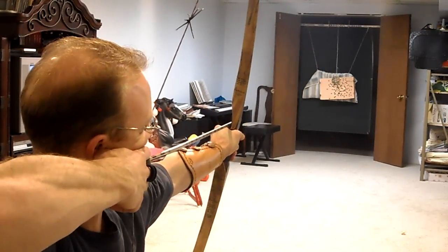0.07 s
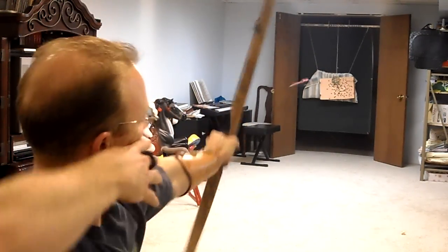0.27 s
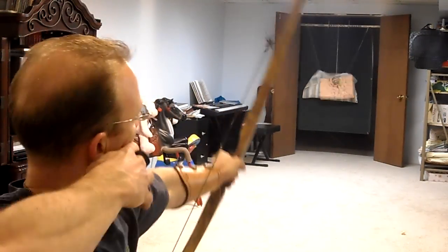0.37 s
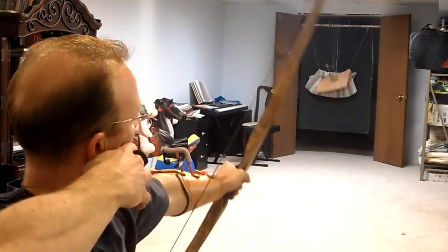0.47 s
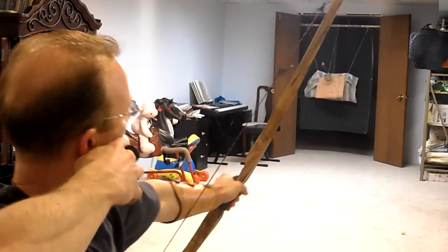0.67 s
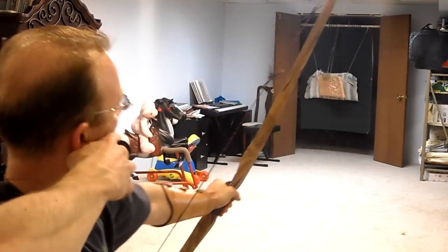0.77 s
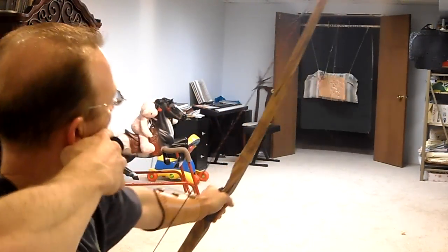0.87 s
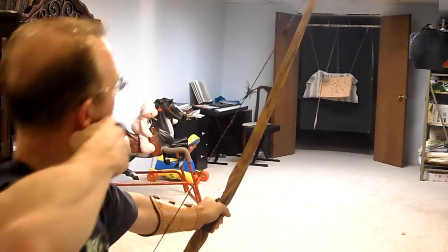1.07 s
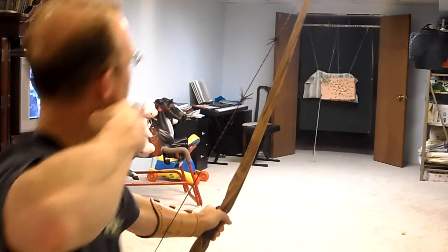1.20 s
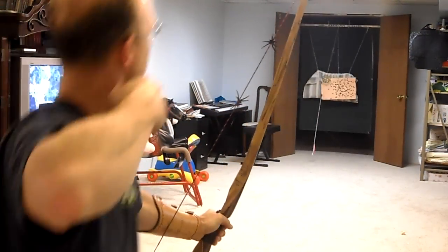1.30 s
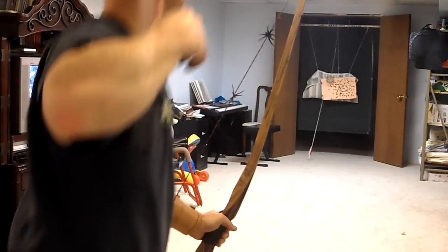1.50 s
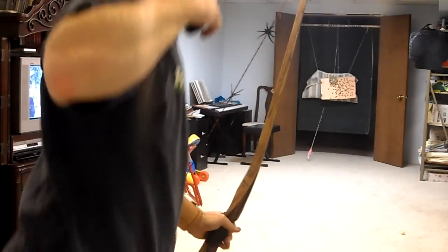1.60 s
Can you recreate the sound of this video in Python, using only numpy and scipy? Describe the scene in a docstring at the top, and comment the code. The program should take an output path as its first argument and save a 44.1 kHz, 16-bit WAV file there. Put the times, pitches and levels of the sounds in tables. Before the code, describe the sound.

Bow twang and sharp slam, a split second later a hard thudding arrow hit across the room

```python
"""Carpeted room: a longbow is loosed close by; the arrow smacks a mat hung some metres off.
Bow: the string creeps on the fingers, the arrow scrapes by (clicks); the slam (clicks) leaves modes humming.
Mat: cracks, tearing clicks, thud of mat and room modes, then slaps and rustle; soft knocks (noise, modes).
Camera: coloured-noise hiss, tick pairs each frame, faint sine whines, a high whistle of two beating sines.
The slam, the smack and a share of the small sounds fill the room (early echo, decaying noise bands)."""
import sys
import numpy as np
from scipy import signal
from scipy.fft import rfft, irfft
from scipy.io import wavfile

SR = 44100
rng = np.random.default_rng(int(sys.argv[2]) if len(sys.argv) > 2 else 0)


def waveform_to_disk(signal):
    """Save audio, clipped to [-1, 1], as 16-bit WAV at the path in sys.argv[1]."""
    frames = np.transpose(np.atleast_2d(signal))
    scaled = np.clip(frames, -1, 1) * 32767
    samples = np.round(scaled).astype(np.int16)
    wavfile.write(sys.argv[1], SR, samples)


def linear_from_db(decibels):
    """Turn decibels (scalar or array-like) into linear amplitude factors; 0 gives 1."""
    return 10 ** (np.asarray(decibels, float) / 20)


N = 72765
T = np.arange(N) / SR

# Spectra give relative density only: colour() sets unit energy.
# camera hiss spectrum: (frequency [Hz], density [dB/Hz])
HISS_SPECTRUM = [(20, -4.5), (200, -10), (700, -3.5), (1400, -13.5), (3000, -15.5), (4600, -20.5),
                 (4900, -14.5), (5200, -21), (10000, -23.5), (15500, -25), (16200, -39.5)]
# hiss and ticks, louder after the shot: (time [s], gain [dB])
HISS_RISE = [(0, -3.5), (.6, 1), (1.66, -0.5)]
# camera whines: (start [s], length [s], frequency [Hz], rms level before waver [dB])
WHINES = [(.0, 0.29, 802, -74), (0.638, 0.16, 811, -66.5), (0.87, 0.086, 802, -63.5),
          (1.039, 0.06, 687, -71), (1.095, 0.028, 694, -68)]
# lower whistle tone: (time [s], peak level [dB])
WHISTLE_LEVEL = [(0, -72), (.2, -71), (.75, -63), (1.0, -61.5), (1.1, -68.5), (1.65, -66)]
HISS_BASE_DB = -67  # before HISS_RISE
FRAMES_PER_S = 29.97
# tick level is before HISS_RISE; gap and lag are medians
TICK_START_S, TICK_BASE_DB, TICK_TOP_HZ, TICK_GAP_S, TICK_JITTER_S = .0148, -52.5, 1500, .0025, .0008
EXTRA_TICK_RE_DB, EXTRA_TICK_LAG_S = -4, 0.037  # looser second pair in each frame
WHINE_EDGE_S, WHINE_WAVER_DB = 0.012, 1.5
WHISTLE_HZ, WHISTLE_BEAT_HZ, WHISTLE_DIP_S = 15734, 10.1, .041
WHISTLE_UPPER_SHARE = .6

# room decay: (frequency [Hz], T60 [s])
ROOM_T60 = [(60, 0.81), (250, 0.4), (1000, 0.34), (3000, 0.39), (7000, 0.39), (14000, 0.24)]
# room tone: (frequency [Hz], relative level [dB])
ROOM_TONE = [(60, -2.5), (250, 1.5), (1000, 5), (3000, -0.5), (7000, -1), (14000, 0.5)]
ROOM_PATCHY_DB, ROOM_CLUMP_SAMPLES, ROOM_BUILD_S = 2.5, 600, 0.0053
BOW_ROOM_DB, MAT_ROOM_DB, SMALL_ROOM_DB = -2, 8, -11  # sends

# mat and arrow rustle: (time [s], level [dB])
RUSTLE_LEVEL = [(.6, -84), (.67, -67), (.68, -58.5), (.69, -62), (.728, -55.5), (.76, -67), (.79, -71),
                (.802, -58.5), (.828, -69.5), (.845, -62.5), (.93, -72.5), (.958, -64), (.985, -75),
                (1.05, -78.5)]
# rustle spectrum: (frequency [Hz], density [dB/Hz])
RUSTLE_SPECTRUM = [(300, -8.5), (700, 3), (2000, -6.5), (3200, -4.5), (4300, 0), (5300, -5.5), (6500, -3),
                   (8000, -9), (14000, -25)]
# soft knocks: (time [s], level [dB], lowest [Hz], highest [Hz], T60 [s])
KNOCKS = [(1.139, -61.5, 3400, 6000, 0.1), (1.244, -58.5, 287, 1290, 0.38), (1.409, -55, 199, 8800, 0.081),
          (1.568, -55.5, 327, 516, 0.15), (1.623, -61, 500, 1298, 0.16)]
# tap on the shaft: (time [s], level re modes [dB])
SHAFT_TAP = [(1.1412, 0)]
# shaft modes: (frequency [Hz], level [dB], T60 [s])
SHAFT_MODES = [(380, -55, .05), (900, -49, .05), (1800, -54, .035)]
# something hollow is bumped: (time [s], level re modes [dB])
THUMPS = [(1.2455, -6), (1.259, 2), (1.299, -7)]
# modes of the hollow thing: (frequency [Hz], level [dB], T60 [s])
THUMP_MODES = [(437.8, -58, 0.09), (684, -57.5, 0.13), (1310, -67.5, 0.093)]
RUSTLE_CLICKS_PER_S = 5000
KNOCK_POLE = 0.7  # tilts knocks to the bass
MODE_RISE_MAX_S = 0.0072

# smack spectrum: (frequency [Hz], density [dB/Hz])
SMACK_SPECTRUM = [(100, -22.5), (300, -7.5), (600, 0), (1200, -8.5), (2500, -7), (4000, -7), (7000, -9.5),
                  (12000, -13.5), (16000, -13)]
# mat modes, with room resonances at 330 and 3150 Hz: (frequency [Hz], level [dB], T60 [s])
MAT_AND_ROOM_MODES = [(38, -54, .45), (245, -25, .12), (330, -37, .35), (368, -28, .12), (520, -26, .18),
                      (612, -21, .11), (668, -26, .13), (780, -22, .11), (930, -23, .09), (1380, -32, .1),
                      (3150, -42, .4)]
# mat slaps back: (time [s], thud level re smack [dB], crackle level [dB])
SLAPS = [(0.4169, -11, -32), (0.435, -15.5, -39), (.47, -15, -33), (.49, -24, -63), (0.554, -31.5, -73)]
# tip tears through: (time [s], click level before band-pass and doubling [dB])
CRACKS = [(.3888, -3), (.3894, -8), (.3912, -11), (.3925, -11), (.3946, -9)]
SMACK_S, SMACK_DB, SMACK_HOLD_S, SMACK_T60_S, SMACK_CLICKS_PER_S = .3886, -16, .006, .03, 12000
CRACK_LOW_HZ, CRACK_HIGH_HZ = 700, 12000

# string creeps on the fingers: (time [s], level [dB])
CREEP_LEVEL = [(.1625, -85.5), (.164, -66), (.171, -62), (.175, -71.5), (.198, -68)]
# arrow scrapes along the bow: (time [s], level [dB])
SCRAPE_LEVEL = [(.1995, -70.5), (.2005, -44), (.2065, -45), (.208, -41), (.214, -48.5), (.219, -36.5),
                (.221, -61.5)]
# creep and scrape spectrum: (frequency [Hz], density [dB/Hz])
SCRAPE_SPECTRUM = [(100, -23.5), (500, -2), (1100, 2), (2500, -6), (5600, -7.5), (9000, -16), (16000, -30)]
# slam spectrum: (frequency [Hz], density [dB/Hz])
SLAM_SPECTRUM = [(60, -16), (460, -7.5), (850, -8.5), (1740, -9), (3500, -1.5), (6000, -4), (9000, -11.5),
                 (16000, -20)]
# string and limb modes: (frequency [Hz], level [dB], T60 [s])
BOW_MODES = [(51.9, -44, 0.12), (187.7, -46, 0.79), (444, -48, 0.34), (463, -44, 0.45), (501, -36, 0.062),
             (732, -45, 0.28), (875, -31, 0.053)]
# arrow knocks the bow in passing: (time [s], level re slam [dB])
NOCK_TAP = (.2075, -16.5)
# early room echo of the slam: (time [s], level [dB])
SLAM_ECHO = [(0.2295, -39)]
SLAM_S, SLAM_DB, SLAM_T60_S, SLAM_CLICKS_PER_S = .2198, -30, 0.028, 6500  # string stops


def rms_one(x):
    """Scale to rms 1."""
    return x / np.sqrt(np.mean(x ** 2) + 1e-20)


def curve(rows):
    """Gain along a (time [s], level [dB]) table, -200 dB outside."""
    s, db = np.transpose(rows)
    return linear_from_db(np.interp(T, s, db, left=-200, right=-200))


def at_hz(points, hz):
    """Read a table on a log-frequency axis."""
    table_hz, value = np.transpose(points)
    return np.interp(np.log(hz + 1), np.log(table_hz), value)


def colour(x, spectrum):
    """Causal minimum-phase filter of unit energy, by folding the cepstrum."""
    log_gain = at_hz(spectrum, np.linspace(0, SR / 2, 4097)) * np.log(10) / 20
    cepstrum = irfft(log_gain)
    cepstrum[1:4096] *= 2
    cepstrum[4097:] = 0
    h = irfft(np.exp(rfft(cepstrum)))
    return signal.fftconvolve(x, h / np.sqrt(np.sum(h ** 2)))[:N]


def click(s, db):
    """One-sample impulse."""
    return linear_from_db(db) * (np.arange(N) == int(s * SR))


def grains(per_s, spread_db):
    """Random clicks of uneven size and sign, rms 1."""
    size = linear_from_db(spread_db * np.minimum(rng.exponential(1, N), 4))
    size = size * rng.choice([-1, 1], N)
    return rms_one(size * (rng.random(N) < per_s / SR))


def blow(s, db, t60, hold=0., attack=.0005):
    """Envelope: linear rise, hold, exponential fall."""
    t = T - s
    fall_db = 60 * np.clip(t - hold, 0, None) / t60
    return np.clip(t / attack, 0, 1) * linear_from_db(db - fall_db)


def ring(blows, modes, soft_cycles):
    """Soft blows set decaying modes ringing; low modes swell more slowly."""
    out = np.zeros(N)
    for s, blow_db in blows:
        t = np.clip(T - s, 0, None)
        for hz, db, t60 in modes:
            level_db = blow_db + db + rng.normal(0, 0.67)
            rise = 1 - np.exp(-t / min(soft_cycles / hz, MODE_RISE_MAX_S))
            out += linear_from_db(level_db - 60 * t / t60) * np.sin(2 * np.pi * hz * t) * rise
    return out


def camera_ticks():
    """Two band-passed up-down click pairs a frame, the second looser in time."""
    count = 49
    frame_s = TICK_START_S + np.arange(count) / FRAMES_PER_S
    chance = rng.standard_normal((count, 6)).T
    extra_s = frame_s + EXTRA_TICK_LAG_S * linear_from_db(3.8 * rng.standard_normal(count))
    clicks = np.zeros(N + SR)
    for start_s, db, draws in ((frame_s, 0, chance[:3]), (extra_s, EXTRA_TICK_RE_DB, chance[3:])):
        jitter, level, spacing = draws
        up_s = start_s + TICK_JITTER_S * jitter
        down_s = up_s + TICK_GAP_S * linear_from_db(3.0 * spacing)
        size = linear_from_db(TICK_BASE_DB + db + 0.73 * level)
        clicks[(up_s * SR).astype(int)] += size
        clicks[(down_s * SR).astype(int)] -= size
    sos = signal.butter(2, [120, TICK_TOP_HZ], "band", fs=SR, output="sos")
    peak = signal.sosfilt(sos, np.eye(1, 99)[0]).max()
    return signal.sosfilt(sos, clicks[:N]) / peak


def camera_whines():
    """Short sines with soft edges and a wavering level."""
    out = np.zeros(N)
    for s, length_s, hz, db in WHINES:
        edge = np.clip(np.minimum(T - s, s + length_s - T) / WHINE_EDGE_S, 0, 1)
        out += np.sqrt(2) * linear_from_db(db) * np.sin(2 * np.pi * hz * T) * edge
    waver = np.interp(T, np.linspace(0, T[-1], 80), rng.standard_normal(80))
    return out * linear_from_db(WHINE_WAVER_DB * waver)


def camera_whistle():
    """Two close high sines beat; they oppose each other at WHISTLE_DIP_S."""
    t = T - WHISTLE_DIP_S
    lower = np.sin(2 * np.pi * WHISTLE_HZ * t)
    upper = np.sin(2 * np.pi * (WHISTLE_HZ + WHISTLE_BEAT_HZ) * t)
    return (lower - WHISTLE_UPPER_SHARE * upper) * curve(WHISTLE_LEVEL)


def camera():
    """Coloured-noise hiss and ticks rise together; whines and whistle add."""
    ticks = camera_ticks()
    tones = camera_whines() + camera_whistle()
    hiss = linear_from_db(HISS_BASE_DB) * colour(rng.standard_normal(N), HISS_SPECTRUM)
    return curve(HISS_RISE) * (hiss + ticks) + tones


def room_response():
    """Dense reflections: half-octave noise bands, each with its own T60, in uneven clumps; unit energy."""
    edges_hz = 40 * 2 ** np.arange(0, 9.1, .5)
    t = T[:SR // 2]
    clump_t = t[::ROOM_CLUMP_SAMPLES]
    white = rng.standard_normal((2, len(t)))
    out = np.zeros(len(t))
    for k, (low, high) in enumerate(zip(edges_hz, edges_hz[1:])):
        hz = np.sqrt(low * high)
        sos = signal.butter(2, [low, high], "band", fs=SR, output="sos")
        band = signal.sosfilt(sos, white[k % 2])  # neighbours use different noise
        clumps_db = ROOM_PATCHY_DB * np.interp(t, clump_t, rng.standard_normal(len(clump_t)))
        out += band * linear_from_db(clumps_db + at_hz(ROOM_TONE, hz) - 60 * t / at_hz(ROOM_T60, hz))
    out *= 1 - np.exp(-t / ROOM_BUILD_S)
    return out / np.sqrt(np.sum(out ** 2))


def rustle():
    """The swinging mat and arrow: coloured clicks along a level curve."""
    return colour(grains(RUSTLE_CLICKS_PER_S, 3.1) * curve(RUSTLE_LEVEL), RUSTLE_SPECTRUM)


def knocks():
    """Shaft and hollow modes ring; band-passed, bass-tilted clicks decay."""
    out = ring(SHAFT_TAP, SHAFT_MODES, soft_cycles=0.52)
    out += ring(THUMPS, THUMP_MODES, soft_cycles=0.52)
    noise = signal.lfilter([1], [1, -KNOCK_POLE], grains(4000, 2.8))
    for s, db, low_hz, high_hz, t60 in KNOCKS:
        sos = signal.butter(2, [low_hz, high_hz], "band", fs=SR, output="sos")
        out += rms_one(signal.sosfilt(sos, noise)) * blow(s, db, t60, attack=0.0017)
    return out


def mat():
    """Cracks of the tip, tearing clicks, thud and later slaps ringing mat and room modes."""
    thuds = [(SMACK_S, 0)] + [row[:2] for row in SLAPS]
    thud = ring(thuds, MAT_AND_ROOM_MODES, soft_cycles=0.98)
    force = blow(SMACK_S, SMACK_DB, SMACK_T60_S, SMACK_HOLD_S)
    for s, _, crackle_db in SLAPS:
        force += blow(s, crackle_db, 0.035, attack=0.0089)
    tearing = colour(grains(SMACK_CLICKS_PER_S, 2.2) * force, SMACK_SPECTRUM)
    sos = signal.butter(1, [CRACK_LOW_HZ, CRACK_HIGH_HZ], "band", fs=SR, output="sos")
    cracks = 2 * signal.sosfilt(sos, sum(click(s, db) for s, db in CRACKS))
    return cracks + tearing + thud


def bow_scrape():
    """String creep and arrow scrape: coloured friction clicks."""
    return colour(grains(9000, 3) * (curve(SCRAPE_LEVEL) + curve(CREEP_LEVEL)), SCRAPE_SPECTRUM)


def bow_slam():
    """The string stops in a click burst, echoed early by the room; string and limb modes hum."""
    bursts = [(SLAM_S, SLAM_DB)] + SLAM_ECHO
    envelope = sum(blow(s, db, SLAM_T60_S, hold=0.00316) for s, db in bursts)
    clicks = colour(grains(SLAM_CLICKS_PER_S, 3.2) * envelope, SLAM_SPECTRUM)
    return clicks + ring([NOCK_TAP, (SLAM_S, 0)], BOW_MODES, soft_cycles=1.45)


def scene():
    """Direct sounds, camera, and the room fed by slam, smack and small sounds."""
    scrape = bow_scrape()
    slam = bow_slam()
    small = rustle() + knocks()
    send = colour(click(SLAM_S, BOW_ROOM_DB), SLAM_SPECTRUM)
    send += colour(click(SMACK_S, MAT_ROOM_DB), SMACK_SPECTRUM)
    send += linear_from_db(SMALL_ROOM_DB) * (small + scrape)
    direct = scrape + slam + mat() + small
    room = signal.fftconvolve(send, room_response())[:N]
    return (direct + room + camera())[None]


def band_limit(x):
    """A steep low-pass at the top of the band."""
    return signal.sosfilt(signal.butter(12, 17110, fs=SR, output="sos"), x)


def record(dry):
    """Steep low-pass: 60 dB down from 17.2 kHz."""
    sos = signal.cheby2(10, 60, 17200, fs=SR, output="sos")
    mix = signal.sosfilt(sos, dry)
    return band_limit(mix)


dry = scene()
out = record(dry)
waveform_to_disk(out)
```